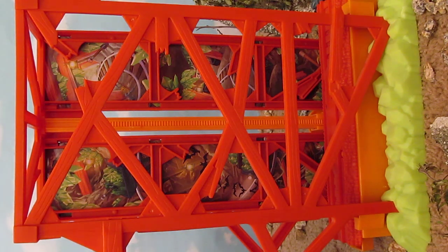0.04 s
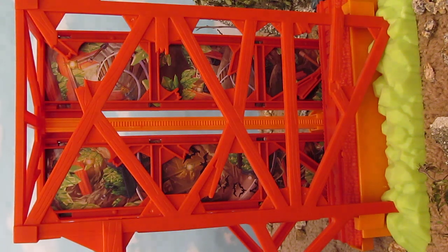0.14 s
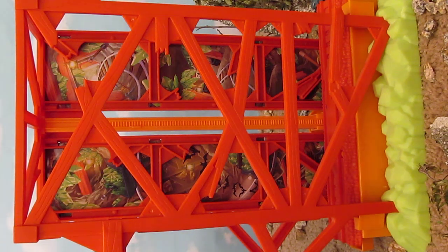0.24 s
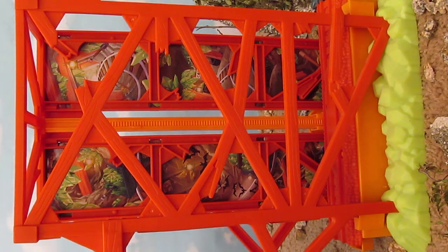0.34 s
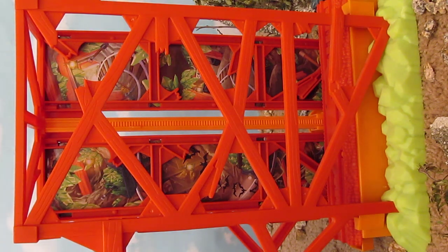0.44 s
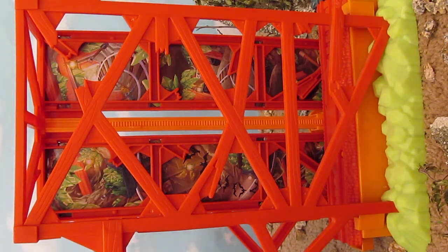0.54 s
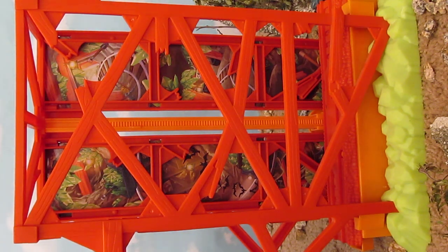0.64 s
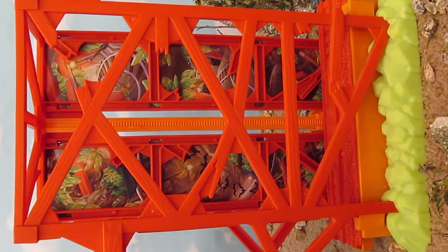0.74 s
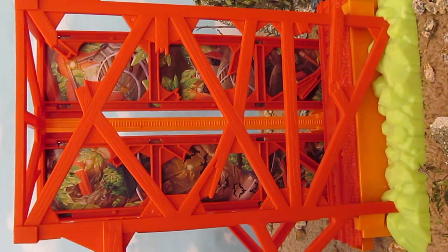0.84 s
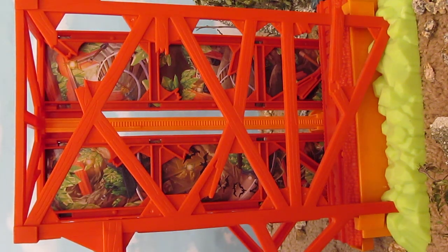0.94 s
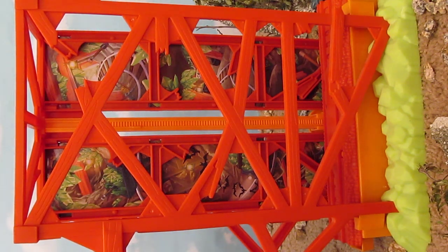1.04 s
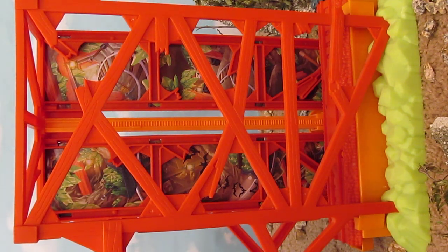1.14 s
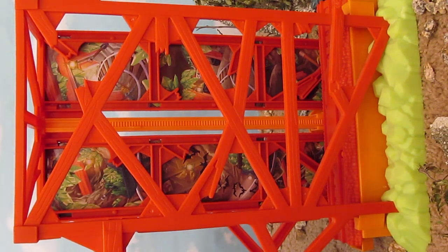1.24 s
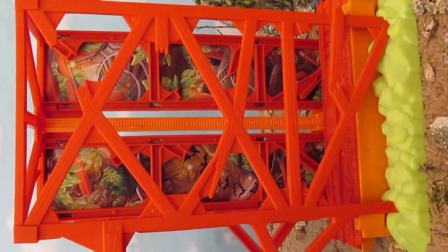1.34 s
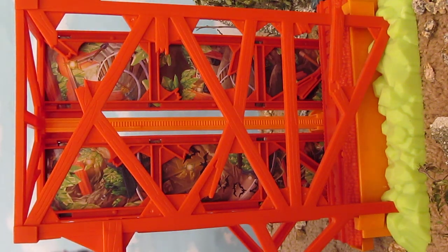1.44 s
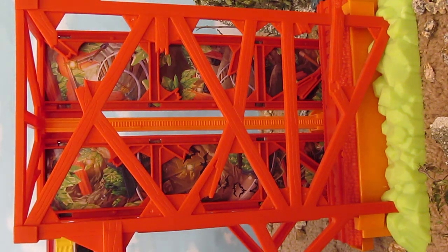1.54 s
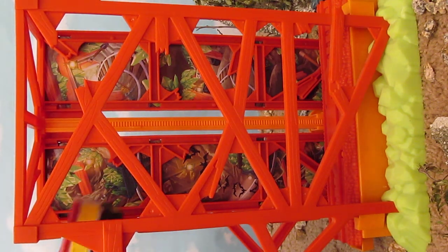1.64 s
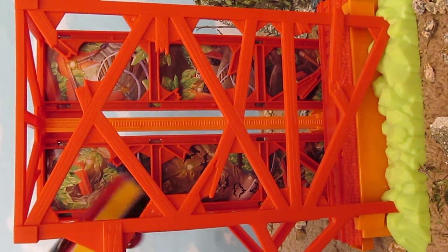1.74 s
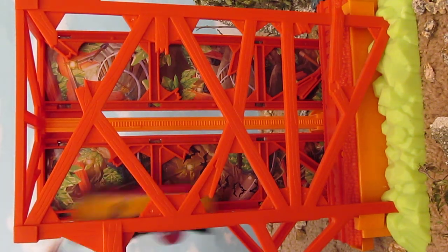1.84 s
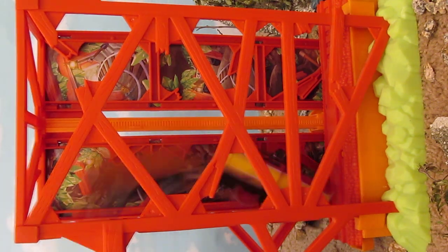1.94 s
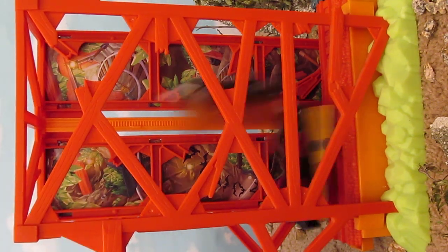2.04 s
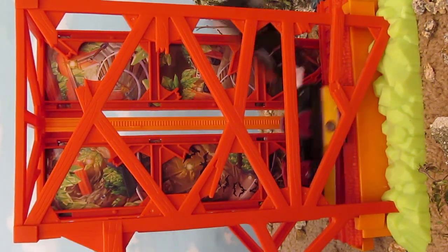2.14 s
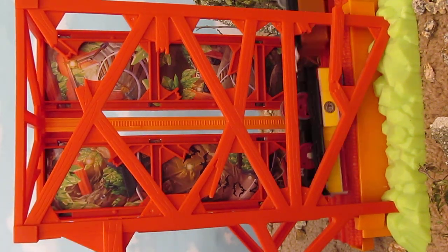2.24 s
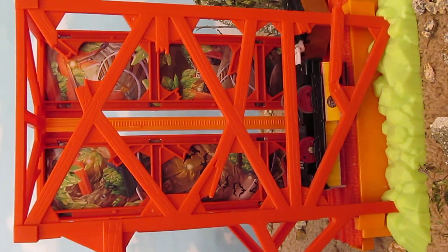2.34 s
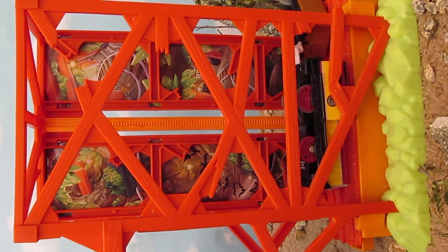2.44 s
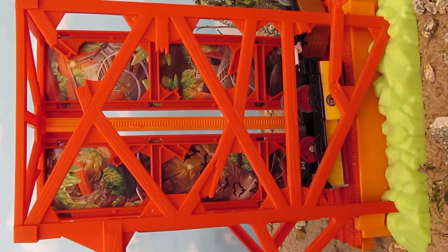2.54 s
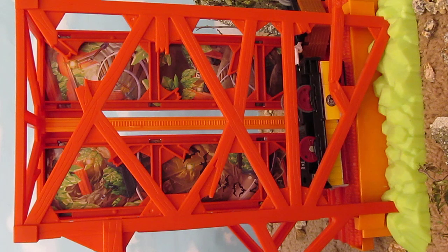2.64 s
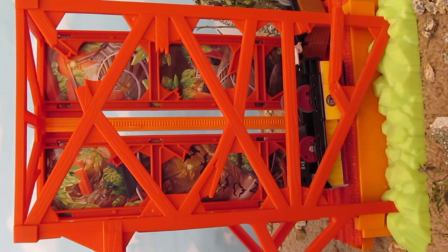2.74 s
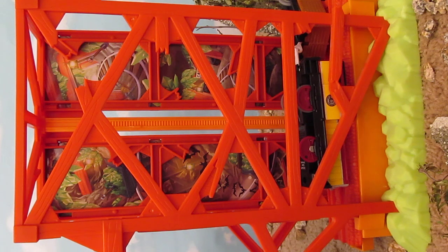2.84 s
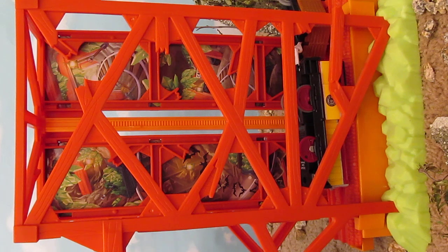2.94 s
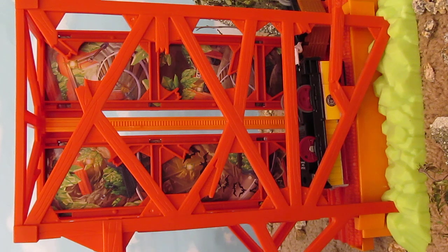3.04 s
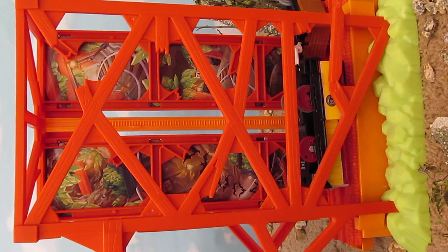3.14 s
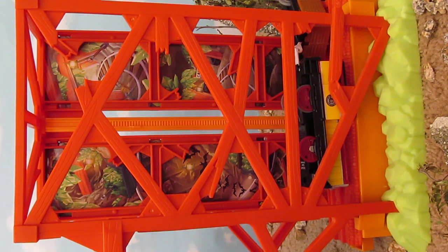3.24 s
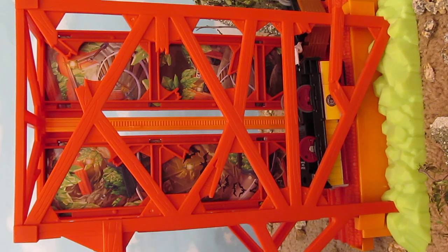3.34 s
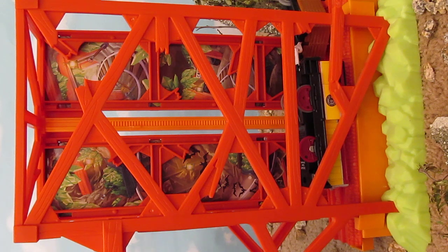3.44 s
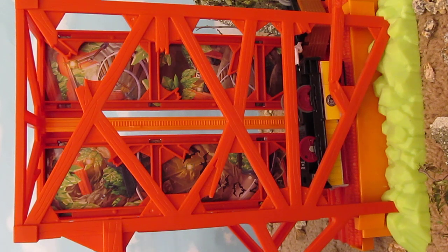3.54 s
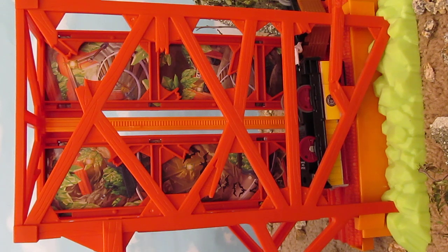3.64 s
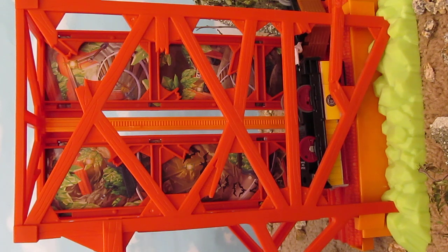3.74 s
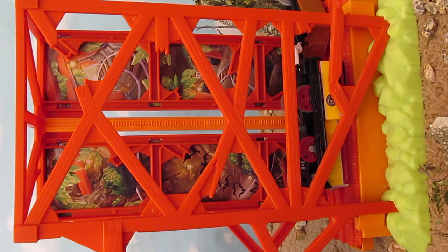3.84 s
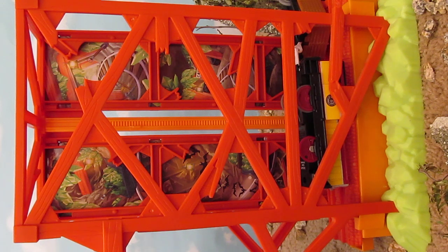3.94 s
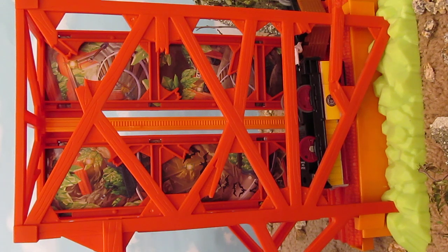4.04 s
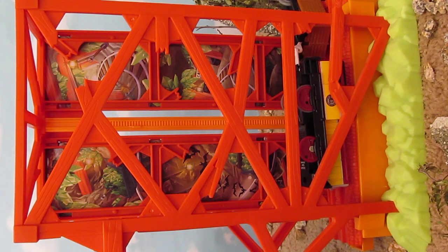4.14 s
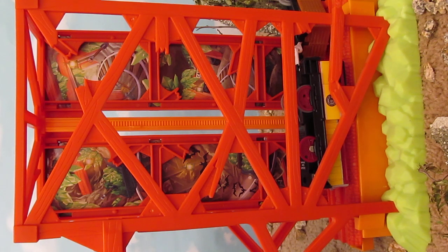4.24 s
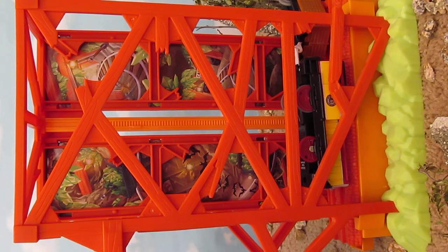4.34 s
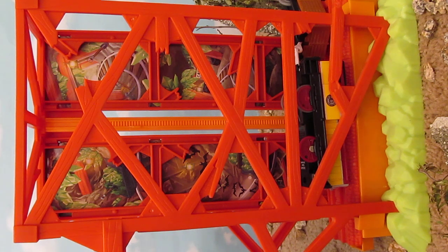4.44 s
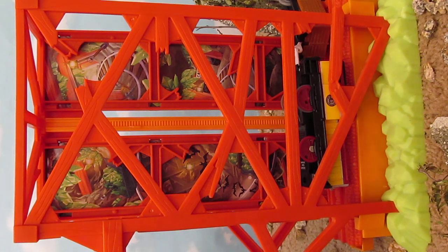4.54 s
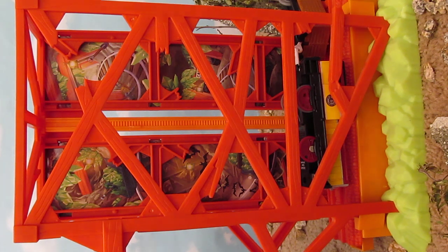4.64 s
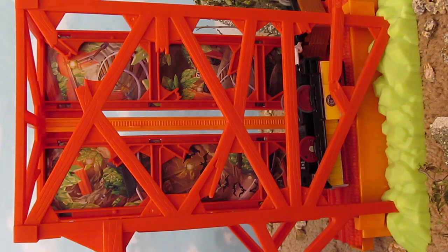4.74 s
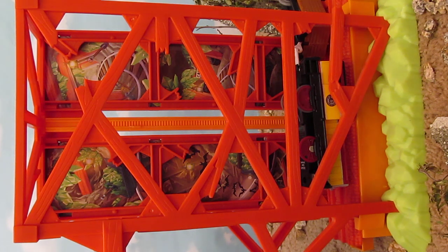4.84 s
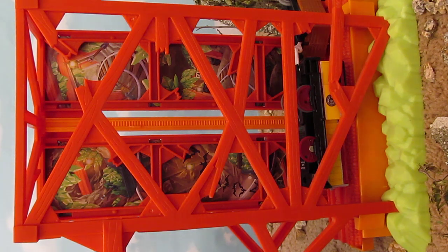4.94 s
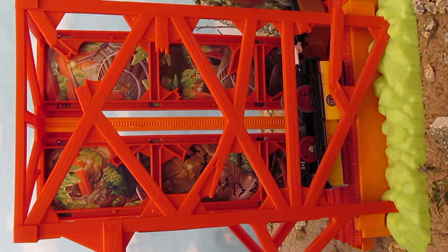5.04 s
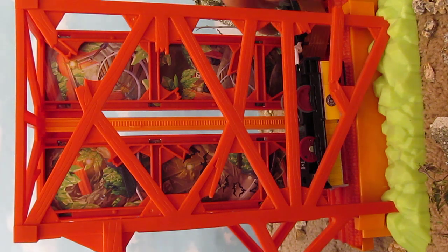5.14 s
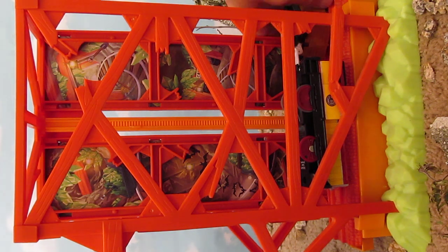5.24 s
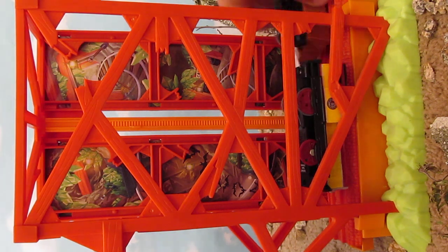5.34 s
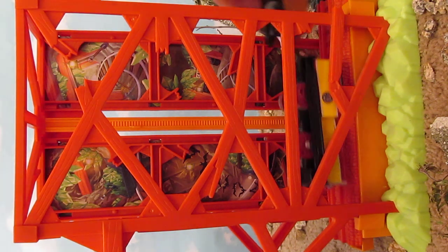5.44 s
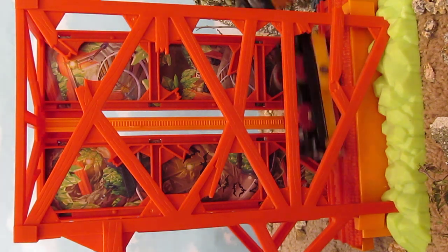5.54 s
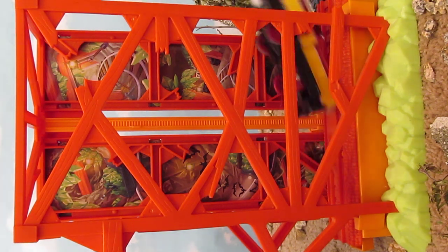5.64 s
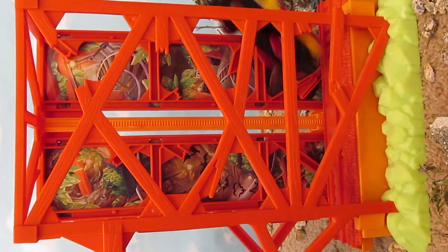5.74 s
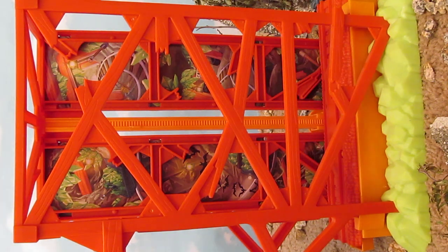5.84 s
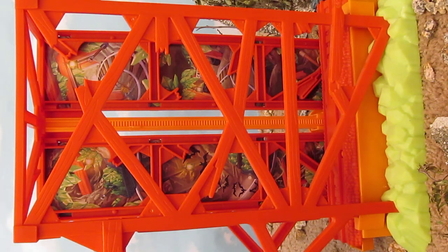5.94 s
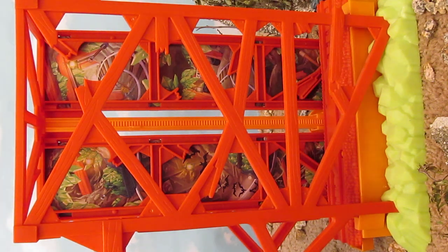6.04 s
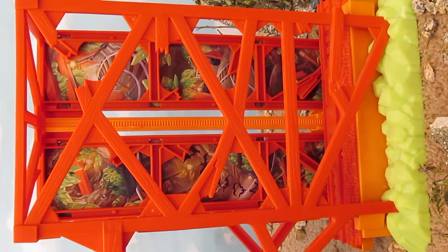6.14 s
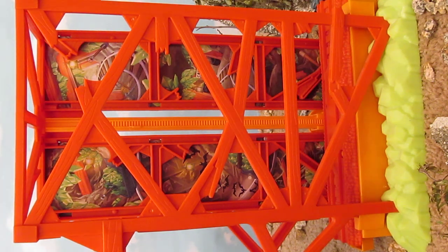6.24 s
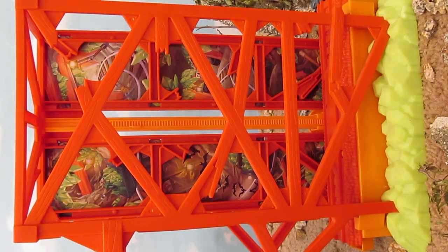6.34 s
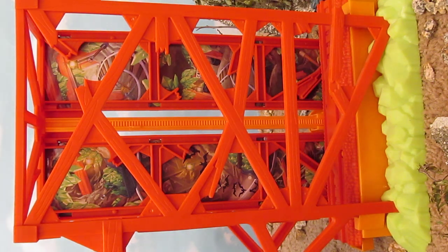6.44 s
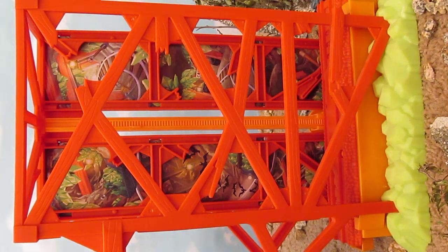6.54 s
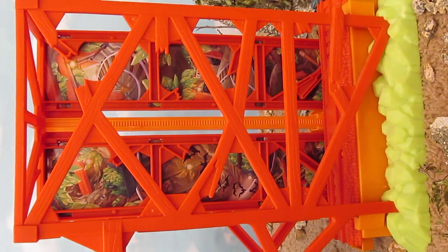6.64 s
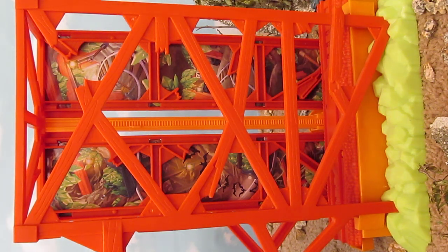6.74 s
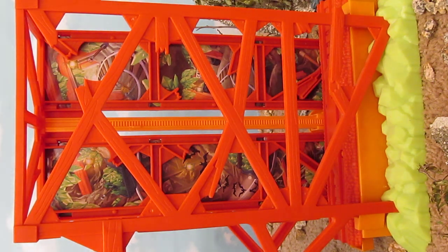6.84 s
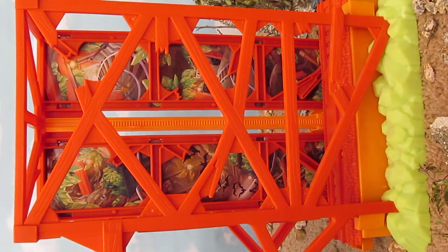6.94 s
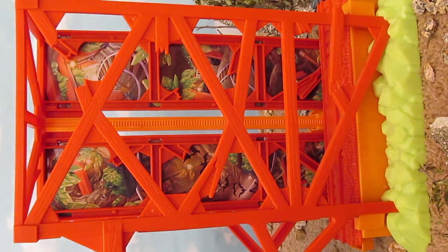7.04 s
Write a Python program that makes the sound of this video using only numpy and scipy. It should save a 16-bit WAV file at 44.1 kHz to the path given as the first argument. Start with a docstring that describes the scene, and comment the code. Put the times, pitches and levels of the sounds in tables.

```python
"""A battery toy train runs on plastic track near a camera: its motor and gears whirr and tick, made of noise
that pulses with the turning shaft and rings the plastic shell and gearbox. It rolls up and tumbles down a chute
with hard clacks (short noise bursts through resonances), waits with its motor spinning and its gears ticking,
is knocked free and drives off. Filtered noise also gives the rumble of track, board and table and the low hum
of the room. The camera's gain control ducks under the hardest blows and creeps back."""
import sys
import numpy as np
from scipy import signal
from scipy.fft import rfft, irfft, next_fast_len
from scipy.io import wavfile
from scipy.ndimage import uniform_filter1d, minimum_filter1d, map_coordinates

SR = 44100
rng = np.random.default_rng(int(sys.argv[2]) if len(sys.argv) > 2 else 0)


def boost_factor(decibels):
    """Convert a level in decibels to a linear amplitude factor."""
    exponent = np.asarray(decibels, float) / 20
    return 10 ** exponent


def inscribe(sig):
    """Save sig as 16-bit PCM at rate SR to the path in sys.argv[1].

    A 1-D sig is mono; a 2-D sig holds one channel per row.
    Samples are clipped to [-1, 1] before scaling.
    """
    pcm = np.round(np.clip(np.atleast_2d(sig).T, -1, 1) * 32767)
    wavfile.write(sys.argv[1], SR, pcm.astype(np.int16))


N = 313551  # length in samples

# How far the motor shaft has turned. Each row: time in seconds, turns made so far.
SHAFT_TURNS = [(0, 2.4), (2.4, 266.43), (2.8, 309.96), (3, 332.14), (4, 443.72), (5, 554.47), (5.6, 620.37),
               (5.9, 653.63), (6.4, 709.72), (6.8, 754.09), (7.11, 787.7)]
# Engine loudness. Each row: time in seconds, middle whirr in dB, low whirr in dB over the middle,
# treble in dB over the middle.
ENGINE_LEVELS = [(0, -31.5, 1, -2.5), (.16, -40.5, 6.5, -3.5), (.61, -37.5, -0.5, -3.5),
                 (.97, -31.5, 3, -3), (1.11, -32, -4, -5.5), (1.25, -40, -1.5, -6.5), (1.7, -37, 1.5, -10),
                 (1.9, -29.5, -18, -3.5), (2.0, -26, -5, -6.5), (2.22, -28, -1.5, -4.5),
                 (2.4, -40.5, 0, -1.5), (5.41, -37, 0.5, -3), (5.52, -41.5, 15.5, 4), (5.6, -29.5, 1, -11),
                 (5.74, -43.5, 4, 1.5), (5.98, -37.5, -3, -5), (6.18, -31, -9, -10), (6.38, -31.5, -4, -14),
                 (6.48, -36.5, 2.5, -9), (6.65, -34, 0.5, -15.5), (6.85, -34, -0.5, -14),
                 (7.01, -30.5, -8, -24.5), (7.11, -28.5, -6, -11)]
# How much of the whirr's power is the gear train, the rest being wheel scrape.
# Each row: time in seconds, share from 0 to 1.
GEAR_SHARE = [(0, 0.2), (.9, 0.17), (1.4, 0.58), (1.7, 0.56), (2.3, 0.2), (2.6, 0.92), (5.2, 0.96),
              (5.5, 0.54), (6, 0.68), (7.11, 0.56)]
# Rattle, boom and drumming around the rolling train, with chance swells and dips.
# Each row: time in seconds, track rattle in dB, table boom in dB, board drumming in dB.
RUMBLE_LEVELS = [(0, -27.5, -22, -30.5), (.2, -40.5, -29, -34), (.38, -41, -24, -39.5),
                 (.45, -41, -45, -35.5), (.54, -33.5, -21.5, -29), (.62, -36, -37, -36.5),
                 (.83, -36, -35, -36.5), (.97, -32, -31, -29.5), (1.04, -36, -38.5, -34),
                 (1.23, -40.5, -37, -40), (1.4, -47.5, -54, -48), (1.62, -44.5, -39.5, -44),
                 (1.72, -37.5, -38, -37), (1.96, -43.5, -45, -42), (2.12, -24, -50, -47),
                 (2.3, -35.5, -60, -45), (2.5, -46, -55, -62), (5.3, -43.5, -45, -50), (5.5, -45, -40, -46),
                 (5.58, -44, -42, -37), (5.66, -26.5, -56, -46), (5.8, -45.5, -40, -42), (6, -48, -54, -56),
                 (7.11, -49, -55, -65)]
# Single hard blows. Each row: start in seconds, strength in dB, knock in dB and snap in dB relative to
# the strength (before fixed trims), pitch of the struck spot in Hz.
CLACKS = [(.071, -7.5, -14.5, -26, 750), (.084, -9.5, -12, -20, 804), (.097, -9.5, -12.5, -20, 640),
          (.658, -9, -24, -47, 668), (.724, -12.5, -18, -35, 580), (0.887, -14.5, -13.5, -25, 660),
          (.953, -12.5, -8, -37, 654), (1.01, -9.5, -21, -23, 630), (1.602, -22, -28, -38, 606),
          (1.653, -17, -12, -21.5, 720), (1.673, -14, -13.5, -24, 1080), (1.693, -13.5, -17, -27, 537),
          (1.74, -13.5, -34, -23, 697), (1.75, -11, -23, -36, 1040), (1.769, -10.5, -22, -29, 645),
          (1.811, -12, -10.5, -11.5, 1140), (1.867, -14.5, -28, -10, 703), (1.888, -6.5, -21, -12, 511),
          (1.903, -13, -18, -4, 700), (1.963, 10, -12.5, -17.5, 800), (1.973, -3, -5, -21, 536),
          (1.989, 1, -19, -13, 644), (1.997, -1.5, -17, -12.5, 678), (2.064, -1.5, -19, -14.5, 794),
          (2.07, 3, -15, -20, 920), (2.078, 3, -13.5, -9.5, 510), (2.127, -2, -13, -14.5, 799),
          (2.159, -2.5, -19.5, -23, 657), (2.226, 0.5, -13.5, -3.5, 890), (2.234, 7, -19.5, -22, 845),
          (2.238, -3, -18, -33, 910), (5.22, -17.5, -13.5, -18, 700), (5.243, -15, -16, -11, 760),
          (5.338, -19.5, -27, -3, 960), (5.349, -15, -15, -14, 850), (5.358, -8, -12.5, -18.5, 745),
          (5.413, -14, -17, -25, 1120), (5.478, -20, -13, -26, 770), (5.503, -7, -6.5, -34, 755),
          (5.524, -7.5, -10.5, -33, 960), (5.543, -14, -7, -34, 990), (5.582, -18, 1, -22, 920),
          (5.592, -11, -8, -23, 860), (5.604, -17, -3, -27, 830), (5.649, -10.5, -8, -36, 627),
          (5.664, -8.5, -11, -30, 640), (5.708, -10, -15.5, -43, 560), (5.776, -17, -8, -28, 730),
          (6.033, -14, -40, -30, 1150), (6.655, -8.5, -27, -59, 740), (6.937, -21, -23, -59, 1100),
          (7.011, -11.5, -26, -55, 1100)]
# Loose parts that clatter between the clacks. Each row: start in seconds, end in seconds, knocks a second,
# average strength in dB, knock in dB and snap in dB (both relative, as for the clacks).
CLATTER = [(1.638, 1.95, 45, -18.5, -21, -25), (5.42, 5.759, 55, -16.5, -18, -34)]

# Resonances; their dB count only relative to each other.
# Lower bands of the plastic shell. Each row: centre in Hz, width in Hz, level in dB.
LOWER_SHELL = [(1313, 400, 2.5), (1513, 181, 12)]
# Upper bands of the shell. Each row: centre in Hz, width in Hz, level in dB.
UPPER_SHELL = [(2126, 158, -1), (2544, 190, -0.5), (2752, 235, -1), (3155, 94, 1.5), (3534, 240, -3)]
# Treble of the gearbox. Each row: centre in Hz, width in Hz, level in dB.
GEARBOX = [(4670, 680, -1.5), (6520, 710, -6), (7210, 84, -3), (8400, 550, -8.5), (10230, 1300, -20)]
# Hollow plastic track. Each row: centre in Hz, width in Hz, level in dB.
TRACK = [(410, 74, -11), (536, 83, -2), (678, 87, 0.5), (838, 136, -1), (907, 131, -2), (1080, 200, -9)]
# Frame that rings under a blow. Each row: centre in Hz, width in Hz, level in dB.
FRAME = [(1420, 226, 1), (2150, 420, 0.5), (2720, 680, 1.5), (4080, 2140, -7)]
# Board under the track. Each row: centre in Hz, width in Hz, level in dB.
BOARD = [(180.6, 25, -8.5), (234, 19.2, -0.5), (274.4, 21.7, -3.5), (355.5, 86, -10)]
# Table under it all. Each row: centre in Hz, width in Hz, level in dB.
TABLE = [(101.1, 15.6, -1.5), (129.4, 15.4, 2), (172, 70, -13)]
# Low hum of the room. Each row: centre in Hz, width in Hz, level in dB.
HUM = [(35, 16, -32), (60.6, 12, 19)]
# Wheel scrape in three lists: low, middle and high. Each row: centre in Hz, width in Hz, level in dB.
SCRAPE = [
    [(1615, 990, 0)],
    [(2300, 640, 0.86), (3420, 1550, -3.4)],
    [(4390, 345, 3), (6500, 1760, -8), (9600, 2300, -13)],
]

# Colour of the bright edge of a blow. Each row: frequency in Hz, level in dB.
SNAP_COLOUR = [(3000, 4), (4500, -4), (5600, -3), (8000, -10), (11000, -17), (16000, -44)]
# How long the room rings before each use speeds it up. Each row: frequency in Hz, time to fall 60 dB in seconds.
ROOM_DECAY = [(200, 0.17), (2000, 0.21), (10000, 0.12)]
# Gliding band that gathers the upper whirr while driving off past the frame.
# Each row: time in seconds, centre in Hz.
GLIDE = [(5.8, 2300), (6.2, 2290), (6.33, 2050), (6.47, 1850), (6.58, 2250), (6.68, 2300), (6.8, 2120),
         (7, 2160), (7.11, 1970)]
# How much the two microphone ports differ. Each row: frequency in Hz, side in dB over the middle.
APART = [(60, -19), (130, -28), (290, -13.5), (640, -18), (1410, -5.5), (3100, -4.5), (6820, -6.5),
         (15000, -4)]
# Where the train is. Each row: time in seconds, left over right in dB,
# milliseconds by which the right port hears it first.
PLACE = [(0, -1.5, -0.076), (1.2, -2, -0.037), (1.9, -2.5, 0.031), (5.6, -2, 0.021), (6.1, -0.5, -0.043),
         (6.4, 4.5, -0.15), (6.65, -3, -0.066), (7.11, -3, -0.061)]
# The camera body shades the ports unevenly. Each row: frequency in Hz, left over right in dB.
PORT_BALANCE = [(60, 2), (150, -2), (380, 1), (950, 1.5), (2380, 1), (5980, 0.5), (15000, -0.5)]

GEAR_RATIO, GEAR_LEAD = 3.6, .45  # shaft turns per gear turn, lead of the tight tooth in shaft turns
LET_GO = 0.41  # radians of lean: the gear tightens slowly and lets go fast
AXLE_RATIO, AXLE_LEAD = 18, 2.5  # shaft turns per axle turn, lead of its heavy side in shaft turns
AXLE_DB = 1.5  # an axle out of round presses the teeth harder once a turn
# the shell's own bands fade out in GATHER_S seconds, later come back by OPEN_PER_S of the power a second
GATHER_S, OPEN_AT_S, OPEN_PER_S = 0.19, 6.83, .9
STEADY_BOOM_DB, STEADY_DRUM_DB, HUM_DB = -42, -49.5, -45.5  # what table, board and room give all the time
BOOM_WAVER_DB = 2.5  # scale of the random waver of the steady boom
CHATTER_S, CHATTER_SPREAD = 0.042, 0.14  # seconds for a blow's chatter to fall 60 dB, log scatter
RISE_S = .0006  # a blow's chatter builds up, time constant
DUCK_FROM_DB, DUCK_SLOPE, DUCK_MOST_DB = -5, 2.1, 10.5  # threshold, dB off per dB over, deepest cut
GRAB_S, HOLD_S, CREEP_S = 0.0037, 0.31, 0.41  # time to fall, to wait, and time constant of the return


def unit(x):
    """Scaled to an average (rms) level of 1."""
    return x / np.sqrt(np.mean(x ** 2) + 1e-20)


def along(points, hz):
    """Reads (Hz, value) points at any frequency, on a log axis."""
    f, v = np.transpose(points)
    return np.interp(np.log(hz + 1), np.log(f + 1), v)


def curves(rows):
    """One value per sample for each column after the time."""
    s, *cols = np.transpose(rows)
    return [np.interp(np.arange(N) / SR, s, c) for c in cols]


def wobble(rate):
    """A smooth random curve with rate knots a second."""
    knots = rng.standard_normal(int(N * rate / SR) + 4)
    return map_coordinates(knots, [np.arange(N) * rate / SR])


def filtered(x, response):
    """Multiplies the spectrum of x by a response that depends on frequency."""
    n = x.shape[-1]
    m = next_fast_len(n + 8192)
    return irfft(rfft(x, m) * response(np.fft.rfftfreq(m, 1 / SR)), m)[..., :n]


def ringing(x, peaks, scatter_db=0):
    """Sends x through resonances whose skirts fall steeply above the top one, rms 1."""
    gains = boost_factor(scatter_db * rng.standard_normal(len(peaks)))
    top_hz = 2.0 * peaks[-1][0]

    def response(f):
        total = 0
        for k, (centre, width, db) in enumerate(peaks):
            peak = 1j * f * width / (centre * centre - f * f + 1j * f * width)
            total = total + (-1) ** k * gains[k] * boost_factor(db) * peak  # neighbours take opposite signs
        return total / (1 + 1j * f / top_hz) ** 2

    return unit(filtered(x, response))


def gliding(drive, hz, width_hz):
    """A resonance whose centre moves: shift down by the centre, keep the slow part, shift back."""
    spin = np.exp(2j * np.pi * np.cumsum(hz) / SR)
    low = drive / spin
    real, imag = filtered(np.array([low.real, low.imag]), lambda f: 1 / (1 + 2j * f / width_hz) ** 3)
    return unit(((real + 1j * imag) * spin).real)


def blend(share, a, b):
    """Mixes two sounds by power, share going to the first."""
    share = np.clip(share, 0, 1)
    return np.sqrt(share) * a + np.sqrt(1 - share) * b


def grit(rate, depth_db):
    """Noise in lumps: many small uneven contacts."""
    return unit(boost_factor(depth_db * wobble(rate)) * rng.standard_normal(N))


def tail(seconds, faster):
    """A room answer of energy 1, made of noise in which each frequency dies at its own speed."""
    hz, t, z = signal.stft(rng.standard_normal(int(seconds * SR)), SR, nperseg=128)
    decay = boost_factor(-60 * faster * t / along(ROOM_DECAY, hz)[:, None])
    h = signal.istft(z * decay, SR, nperseg=128)[1]
    return h / np.linalg.norm(h)


def in_room(x, wet_db, faster):
    """Adds the room's answer, which starts a few milliseconds later."""
    late_tail = np.pad(tail(.2, faster), (150, 0))
    return x + boost_factor(wet_db) * signal.fftconvolve(x, late_tail)[:len(x)]


def ports(x):
    """The two microphone ports agree in the bass; near reflections part them in the treble."""
    echo = tail(.03, faster=7)
    other = signal.fftconvolve(x, echo)[:len(x)]

    def middle_and_side(hz):
        angle = np.arctan(boost_factor(along(APART, hz)))
        return np.array([np.cos(angle), np.sin(angle)])

    mid, side = filtered(np.array([x, other]), middle_and_side)
    return np.array([mid + side, mid - side])


def wavering_room(x, wet_db, faster, turns):
    """Two sets of reflections mix in randomly wavering amounts, so the whirr's fine colour keeps shifting."""
    angle = turns * wobble(4.046)
    one, other = (ports(in_room(x, wet_db, faster)) - x for _ in range(2))
    return x + np.cos(angle) * one + np.sin(angle) * other


def placed(pair, pan_db, first_ms):
    """Leans and delays a pair of port signals towards one side."""
    n = np.arange(pair.shape[1])
    late = first_ms * SR / 2000  # samples, half the delay for each port
    moved = [map_coordinates(v, [n - way * late], order=3) for v, way in zip(pair, (1, -1))]
    lean_db = np.multiply.outer([.5, -.5], pan_db * np.ones(len(n)))
    return boost_factor(lean_db) * moved


def gears(sharp, tight, noise, tick):
    """Teeth chatter and tick each shaft turn, harder and shifted as the big gear's tight side comes round."""
    shaft = curves(SHAFT_TURNS)[0]
    gear = 2 * np.pi * (shaft + GEAR_LEAD) / GEAR_RATIO
    beat = 2 * np.pi * shaft - .45 * np.sin(gear + .3)
    turn = np.round(beat / (2 * np.pi)).astype(int)
    own_force = boost_factor(1.4 * rng.standard_normal(1000))[turn]  # each turn has its own
    gear_force = np.exp(tight * (np.cos(gear + LET_GO * (1 - np.cos(gear))) - 1))
    axle_force = boost_factor(AXLE_DB * np.cos(2 * np.pi * (shaft + AXLE_LEAD) / AXLE_RATIO))
    force = own_force * gear_force * axle_force
    pulses = unit(force * np.exp(sharp * (np.cos(beat) - 1)))
    chatter = unit(pulses + noise) * rng.standard_normal(N)
    strike = np.diff(np.floor(beat / (2 * np.pi)), prepend=0) > 0  # one click per turn
    return unit(chatter + tick * unit(force * strike))


def engine():
    """Gear chatter rings the plastic shell and the gearbox; wheel scrape fills the same bands more evenly."""
    middle_db, low_db, treble_db = curves(ENGINE_LEVELS)
    levels_db = middle_db + low_db, middle_db, middle_db + treble_db
    glide_hz, t = curves(GLIDE)[0], np.arange(N) / SR
    gathered = np.clip((t - GLIDE[0][0]) / GATHER_S, 0, 1)
    away = gathered - OPEN_PER_S * np.maximum(t - OPEN_AT_S, 0)
    shell = gears(sharp=0.66, tight=0.91, noise=0.69, tick=0.23)
    box = gears(sharp=0.52, tight=0.84, noise=0.053, tick=0.46)
    scrape = grit(130, depth_db=2.5)
    upper = blend(away, gliding(shell, glide_hz, width_hz=1100), ringing(shell, UPPER_SHELL))
    teeth = ringing(shell, LOWER_SHELL), upper, ringing(box, GEARBOX)
    wheels = [ringing(scrape, band) for band in SCRAPE]
    wheels[1] = blend(away, gliding(scrape, glide_hz, width_hz=1100), wheels[1])
    share = curves(GEAR_SHARE)[0]
    whirr = sum(boost_factor(db) * blend(share, gear, wheel) for db, gear, wheel in zip(levels_db, teeth, wheels))
    around = wavering_room(whirr, wet_db=-12.0, faster=1.24, turns=0.71)
    return placed(around, *curves(PLACE))


def rumble():
    """Lumpy noise rings the hollow track, the board under it and the table, with swells and dips."""
    rattle_db, boom_db, drum_db = curves(RUMBLE_LEVELS)
    rattle = boost_factor(rattle_db) * ringing(grit(60, depth_db=1.0), TRACK)
    steady_boom = boost_factor(STEADY_BOOM_DB + BOOM_WAVER_DB * wobble(9))
    boom = np.hypot(boost_factor(boom_db), steady_boom) * ringing(grit(25, depth_db=0.5), TABLE)
    drum_gain = np.hypot(boost_factor(drum_db), boost_factor(STEADY_DRUM_DB))
    drum = drum_gain * ringing(grit(25, depth_db=0.5), BOARD)
    return ports(rattle + boom + drum)


def hum():
    """A low wavering hum fills the room: noise through narrow low resonances."""
    return boost_factor(HUM_DB) * ports(ringing(rng.standard_normal(N), HUM))


def one_blow(db, knock_db, snap_db, spot_hz):
    """A sharp push and a dying chatter ring track, board, frame and bright edges."""
    t = np.arange(SR // 4) / SR
    fade = boost_factor(-60 * t / (CHATTER_S * np.exp(CHATTER_SPREAD * rng.standard_normal())))
    blow = fade * (1 - np.exp(-t / RISE_S)) * rng.standard_normal(len(t))
    blow[0] += 3  # the push
    # the spot that is hit favours the track modes near its own pitch
    struck = [(hz, w, level - 22 * abs(np.log2(hz / spot_hz))) for hz, w, level in TRACK]
    # dull blows leave out the top modes
    tilt = 0.18 * (snap_db + 19)  # dB per octave
    frame = [(hz, w, level + tilt * np.log2(hz / 1500)) for hz, w, level in FRAME]
    # low modes answer mostly to the first push, so their chatter fades twice
    parts = (ringing(fade * blow, struck, scatter_db=4.5),
             ringing(fade * blow, BOARD),
             ringing(blow, frame, scatter_db=2.5),
             filtered(blow, lambda f: boost_factor(along(SNAP_COLOUR, f)) * (f / (f - 2800j)) ** 4))
    knock, thud, body, snap = (p / np.abs(p).max() for p in parts)
    low = boost_factor(knock_db + 5) * (knock + boost_factor(-17.0) * thud)
    return boost_factor(db) * (low + boost_factor(-3 + 0.11 * snap_db) * body + boost_factor(snap_db + 6.0) * snap)


def clacks():
    """Every blow is made anew, rings in the room and comes from where the train is."""
    out = np.zeros((2, N + SR))
    pan_db, first_ms = curves(PLACE)
    for s, *blow in CLACKS + clatter():
        heard = ports(in_room(one_blow(*blow), wet_db=-8.0, faster=1.78))
        i = round(s * SR)
        out[:, i:i + heard.shape[1]] += placed(heard, pan_db[i], first_ms[i])
    return out[:, :N]


def clatter():
    """Small blows of loose parts at random moments and spots, as rows like the clacks."""
    rows = []
    for start, end, rate, db, knock_db, snap_db in CLATTER:
        when, size, spot = rng.random((40, 3)).T
        times = start + (np.arange(40) + when) / rate
        for s, b, c in zip(times, size, spot):
            if s < end:
                rows.append((s, db + 6 * (b - .5), knock_db, snap_db, 600 * 2 ** c))
    return rows


def scene():
    """Everything at the two ports."""
    return engine() + rumble() + clacks() + hum()


def gain_control(x):
    """Gain falls fast when a peak passes the threshold, holds, then creeps back."""
    peak_db = 20 * np.log10(np.abs(x).max(axis=0) + 1e-9)
    cut_db = np.clip(DUCK_SLOPE * (peak_db - DUCK_FROM_DB), 1e-3, DUCK_MOST_DB)
    hold, grab, t = int(HOLD_S * SR), int(GRAB_S * SR), np.arange(N) / SR / CREEP_S
    # the deepest cut of the last HOLD_S seconds, as a logarithm
    held = -minimum_filter1d(-np.log(cut_db), hold, origin=(hold - 1) // 2, mode="nearest")
    cut_db = np.exp(np.maximum.accumulate(held + t) - t)  # the cut in dB shrinks exponentially
    smooth_db = uniform_filter1d(cut_db, grab, origin=(grab - 1) // 2, mode="nearest")
    return x * boost_factor(-smooth_db)


def top_cut(x):
    """Nothing passes above the cut-off."""
    return signal.sosfilt(signal.butter(12, 16190, fs=SR, output="sos"), x)


def record(dry):
    """Shaded ports, gain control, then an input that rounds off the loudest peaks."""
    shaded = filtered(dry, lambda hz: boost_factor(np.outer([.5, -.5], along(PORT_BALANCE, hz))))
    heard = gain_control(shaded)
    soft = heard / (1 + np.abs(heard / 1.3) ** 6) ** (1 / 6)
    return top_cut(soft)


dry = scene()
out = record(dry)
inscribe(out)
```